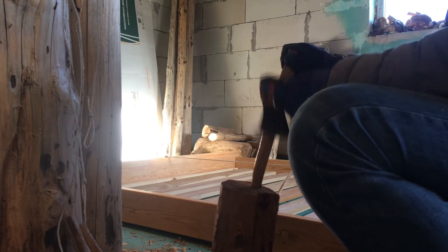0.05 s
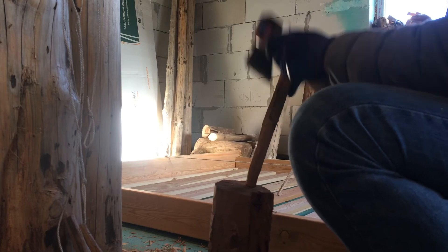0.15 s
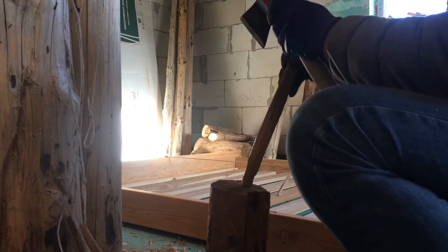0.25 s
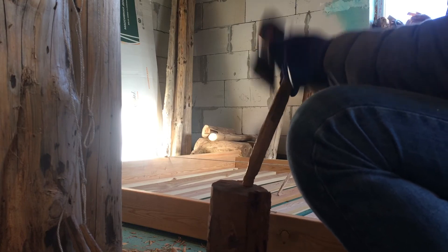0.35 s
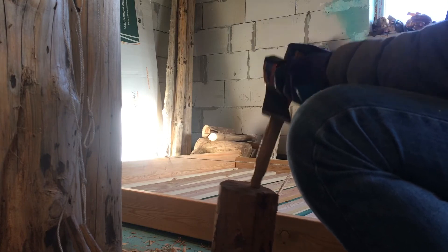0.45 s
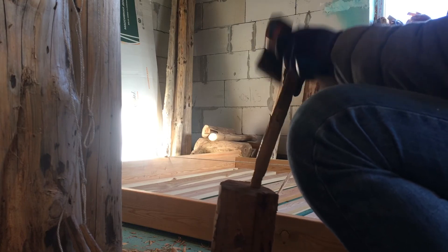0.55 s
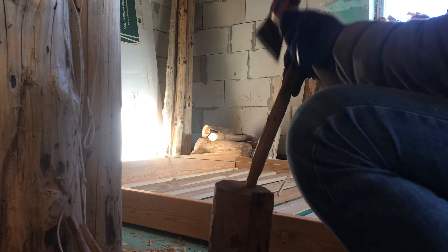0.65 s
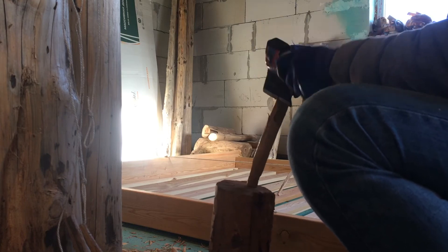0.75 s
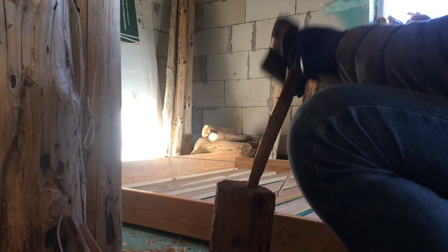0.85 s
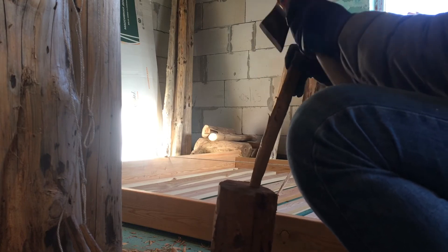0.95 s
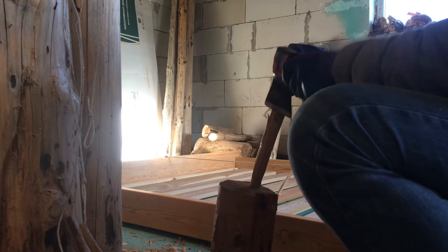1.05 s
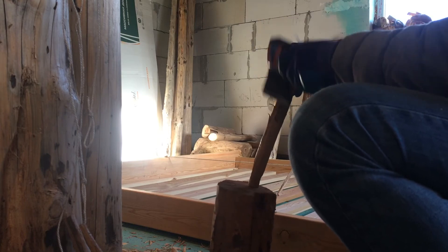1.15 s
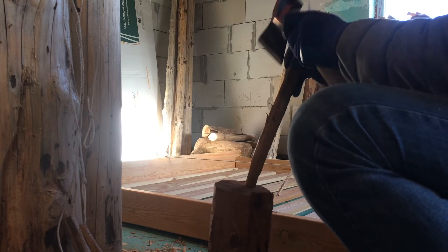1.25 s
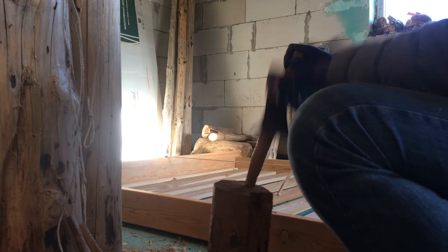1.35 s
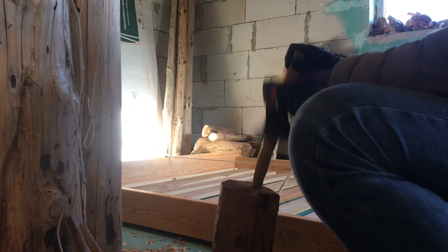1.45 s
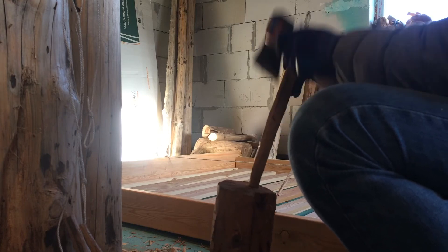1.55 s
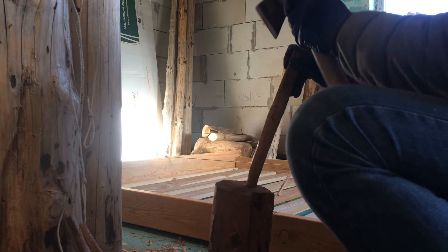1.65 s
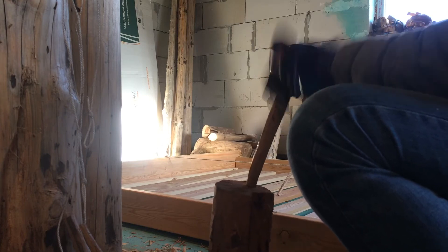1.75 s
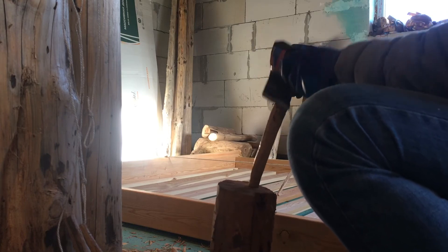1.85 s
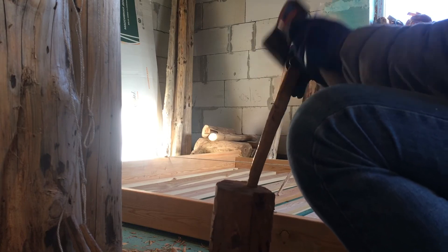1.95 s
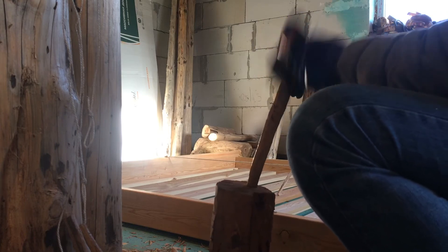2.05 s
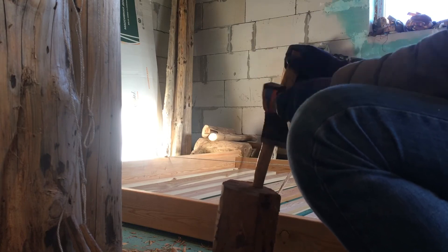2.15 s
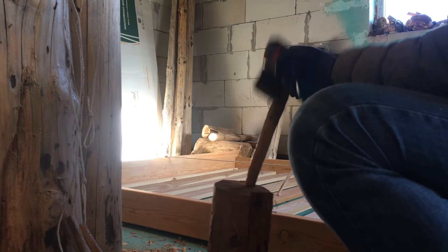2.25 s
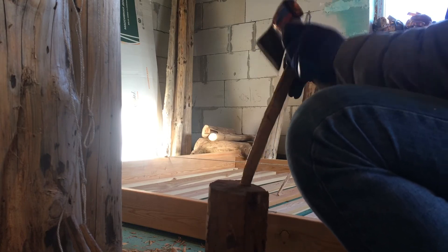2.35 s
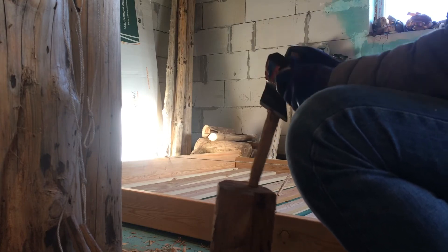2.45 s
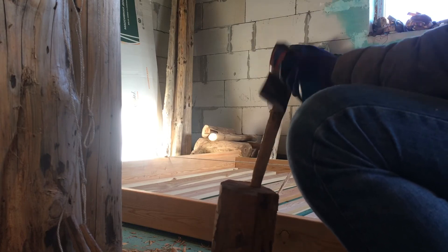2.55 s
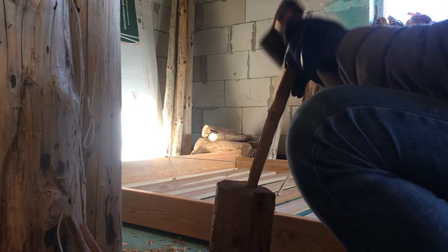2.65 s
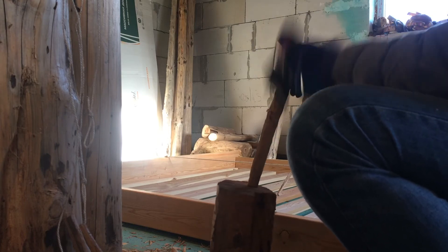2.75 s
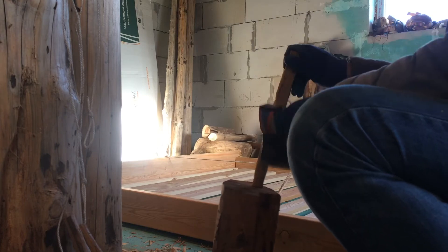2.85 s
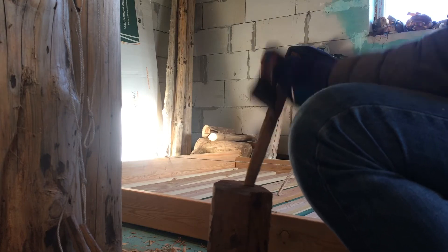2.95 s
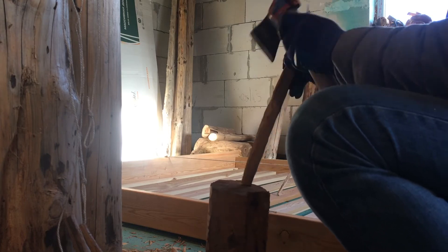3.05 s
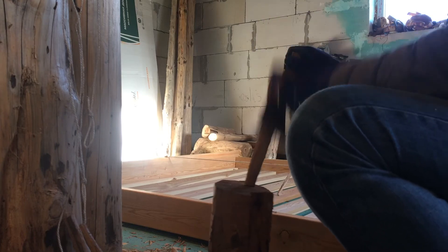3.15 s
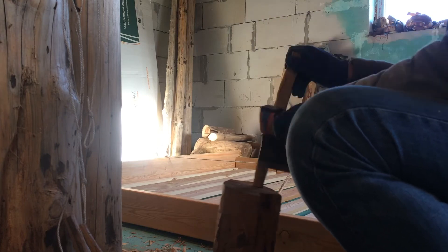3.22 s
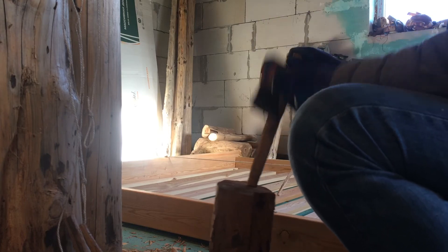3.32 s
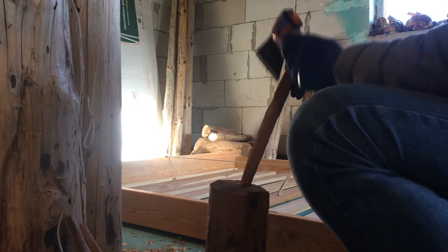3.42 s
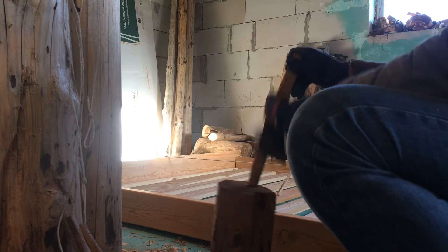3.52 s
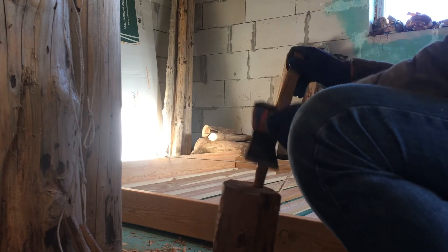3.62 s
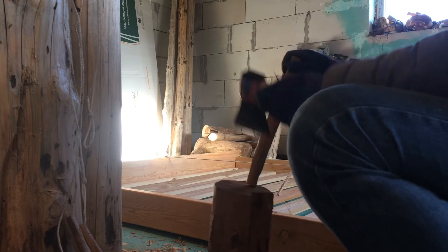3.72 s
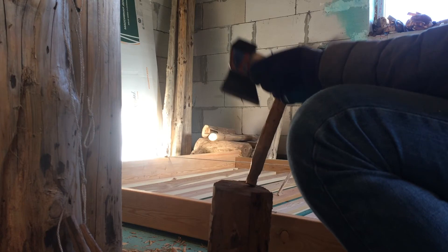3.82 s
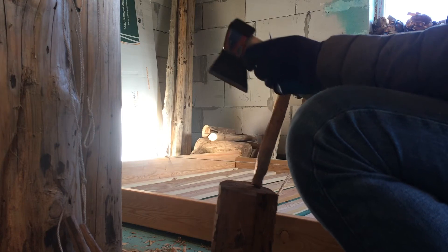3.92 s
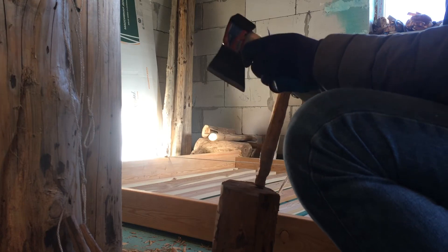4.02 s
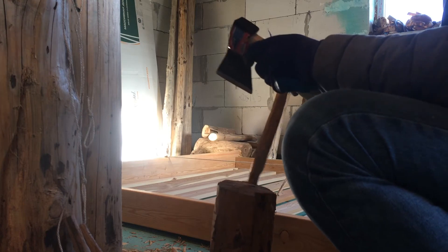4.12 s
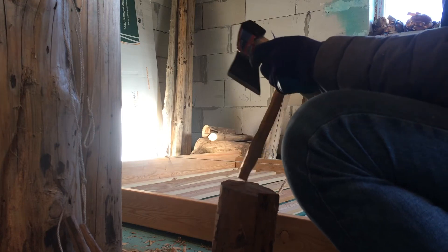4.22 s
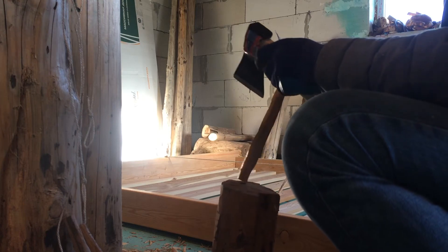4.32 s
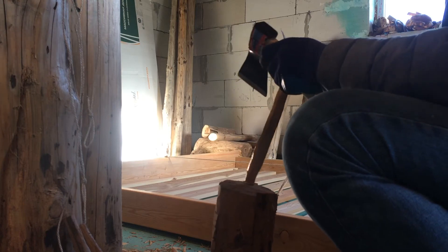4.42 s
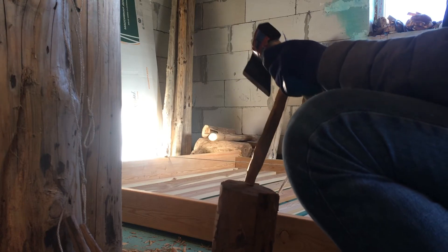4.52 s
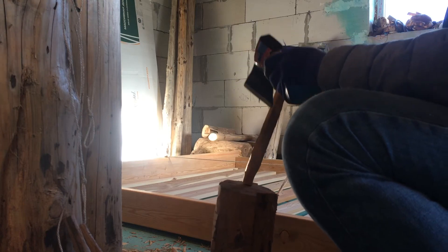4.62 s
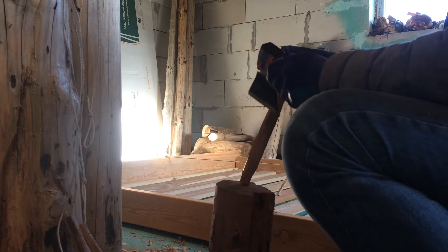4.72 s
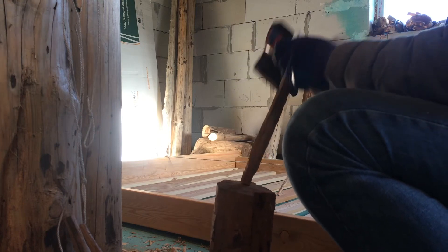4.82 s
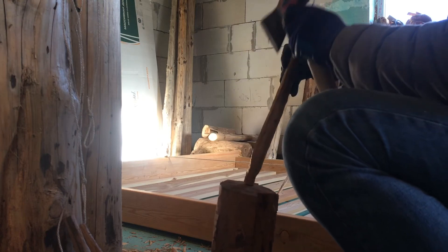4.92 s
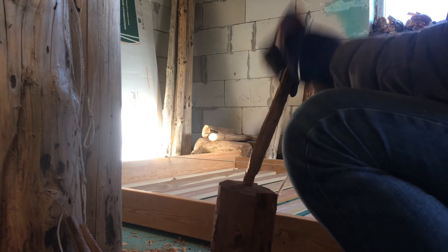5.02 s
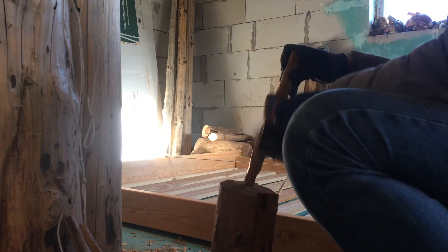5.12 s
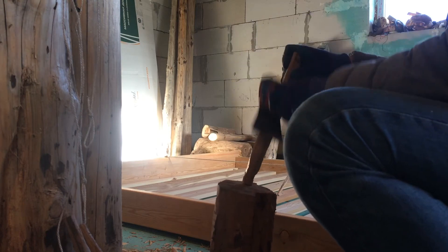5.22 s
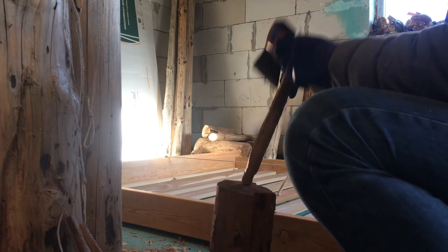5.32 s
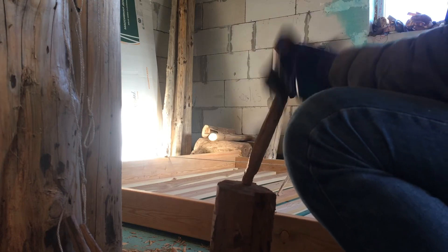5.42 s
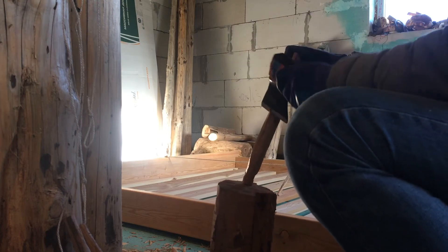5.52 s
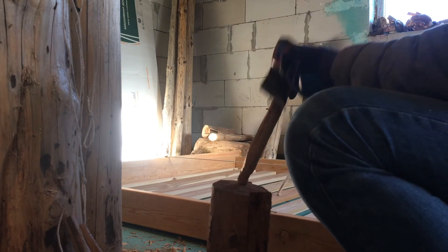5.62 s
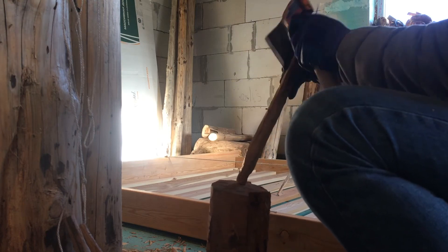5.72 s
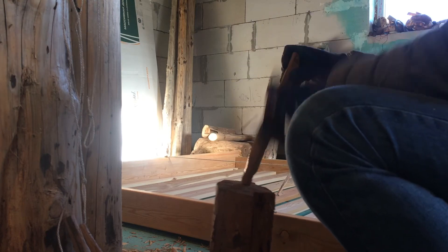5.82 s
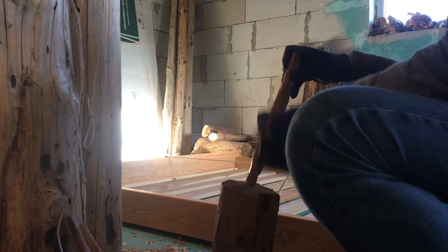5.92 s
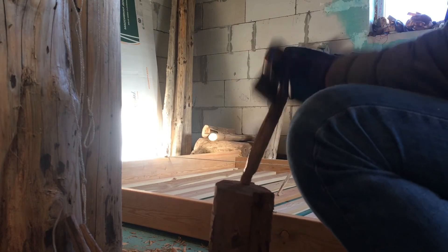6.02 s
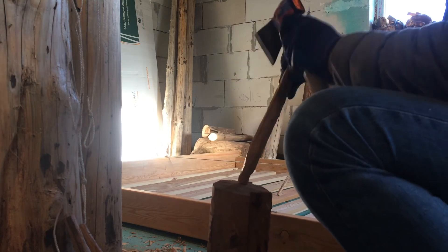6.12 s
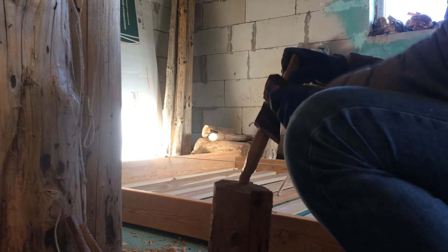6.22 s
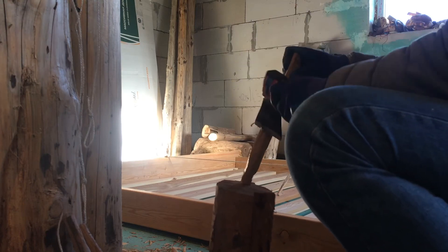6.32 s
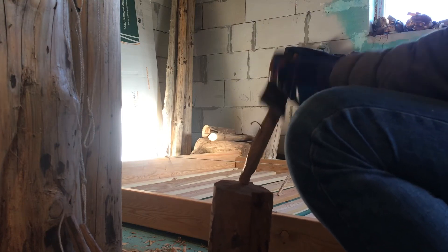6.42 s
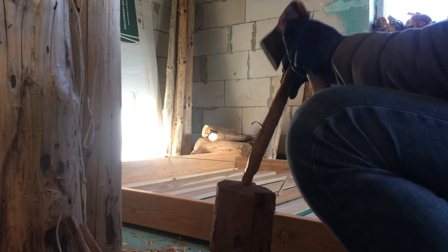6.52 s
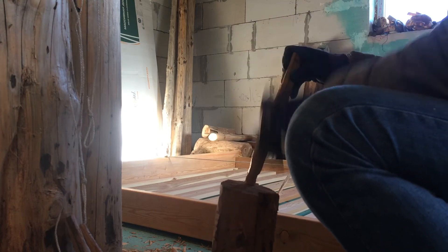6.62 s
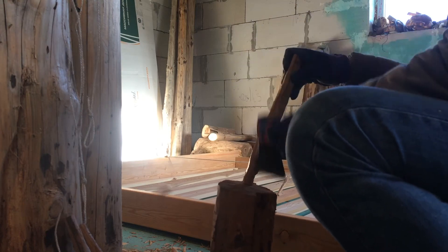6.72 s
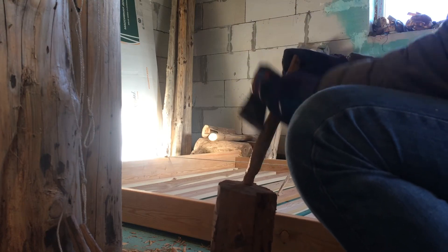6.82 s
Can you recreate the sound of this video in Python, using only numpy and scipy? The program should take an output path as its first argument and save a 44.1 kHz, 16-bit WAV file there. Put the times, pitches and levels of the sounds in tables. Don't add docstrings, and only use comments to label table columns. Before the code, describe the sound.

Sharp hatchet strokes knock and tear hardwood, the block thumping on floorboards, short bare-wall echoes over a low, distant outdoor rumble.

```python
import sys
import numpy as np
from scipy import signal
from scipy.fft import rfft, irfft
from scipy.io import wavfile
from scipy.ndimage import uniform_filter1d

SR = 44100
rng = np.random.default_rng(int(sys.argv[2]) if len(sys.argv) > 2 else 0)


def wav_out(sig):
    wavfile.write(sys.argv[1], SR, np.round(np.clip(np.atleast_2d(sig).T, -1, 1) * 32767).astype(np.int16))


def magnitude_from_level(level_db):
    exponent = np.asarray(level_db, float) / 20
    return 10 ** exponent


N = 302967

# time in seconds, peak level in dB, knock pitch in Hz,
# stick ring in dB, share sent to the room in dB.
BLOWS = [(0.021, -8.5, 1420, -5, -2.5), (0.4655, -25.5, 1040, -40, -2), (0.4679, -22, 670, -35, -13),
         (0.786, -17.5, 1060, -1, -11), (0.7889, -19, 1290, -23, -13), (1.1126, -16, 1020, 1, -4.5),
         (1.1183, -17.5, 800, -41, -10.5), (1.1188, -32, 850, -35, -26), (1.1211, -19, 730, -35, -30),
         (1.41, -10.5, 1380, -9, -4.5), (1.413, -13.5, 1360, -32, -20), (1.8398, -10, 1145, -22, -9),
         (1.842, -17.5, 900, -31, -34), (2.1462, -12.5, 1120, -2, -6), (2.148, -36, 980, -35, -15),
         (2.162, -30, 890, -25, -12), (2.168, -28, 900, -12, -6), (2.4922, -19.5, 940, -5, -5.5),
         (2.495, -22, 1280, -21, -22), (2.8506, -20.5, 980, -12, -3), (2.8521, -26, 780, -30, -15),
         (2.855, -15, 900, -36, -17), (2.861, -19, 1120, -5.5, -2.5), (2.8745, -34, 1300, -9, -15),
         (2.884, -26, 900, -15, -14), (2.8924, -21, 960, -12, -12), (2.926, -40, 1300, -8, -12),
         (3.228, -15, 1120, -2, -2), (3.229, -13, 1210, -37, -24), (3.232, -29, 1390, -12, -19),
         (3.265, -25, 1200, -7, -13), (3.557, -10.5, 1100, -7, -6), (5.1373, -27.5, 1560, 1.5, 0),
         (5.525, -13.5, 1084, -42, -10.5), (5.8895, -20, 1030, 1.5, 1), (5.896, -20, 1880, -38, -27),
         (5.9192, -22, 980, -7.5, -25), (6.2783, -8, 1320, -10.5, -6), (6.7001, -23, 1300, -37, -30),
         (6.7009, -30, 1300, -35, -26), (6.7019, -14, 1220, -7, -0.5), (6.7041, -24, 1340, -13, -20),
         (6.792, -34, 1300, 1, -15)]
# start in seconds, low, middle and top mode levels in dB,
# ring length as a factor.
STEEL = [(0.022, -56, -62, -75, 0.89), (0.468, -69, -71, -65, 0.37), (0.786, -72, -86, -85, 1.4),
         (1.1125, -52, -72, -68, 0.36), (1.409, -51, -60, -76, 1), (1.8392, -73, -43, -81, 0.15),
         (2.161, -50, -74, -74, 0.71), (2.4926, -71, -88, -85, 1.4), (2.861, -46.5, -49, -69, 0.64),
         (3.231, -46, -54, -71, 0.58), (3.559, -43.5, -67, -78, 0.79), (5.136, -51, -58, -72, 0.5),
         (5.199, -48.5, -62.5, -95, 0.57), (5.525, -76, -86, -75, 1.1), (5.675, -73, -77, -91, 0.7),
         (5.894, -53.5, -54, -77, 0.86), (6.285, -47.5, -76, -68, 0.35), (6.706, -34, -47.5, -64, 0.24),
         (6.829, -70, -61, -95, 0.28)]
# pitch in Hz, width in Hz, level in dB.
STICK = [(270, 260, -8.5), (549, 93, -7), (980, 186, -8.5), (1120, 940, -6), (1387, 62, -15.5),
         (1710, 140, -27), (2340, 340, -13), (3170, 1300, -12), (3890, 720, -53)]


def evened(x):
    return x / np.sqrt(np.mean(x ** 2) + 1e-20)


def read(points, hz):
    f, value = np.transpose(points)
    return np.interp(np.log(hz + 1), np.log(f + 1), value)


def add(mix, s, sound):
    part = mix[max(round(s * SR), 0):][:len(sound)]
    part += sound[:len(part)]


def latest(starts, lead):
    return np.maximum(np.searchsorted(np.array(starts) - lead, np.arange(N) / SR) - 1, 0)


def bandpass(order, edges_hz):
    return signal.butter(order, edges_hz, "band", fs=SR, output="sos")


def swell(t, db, rise, t60, bend):
    fall_db = 60 * np.maximum(t - rise, 0) / max(t60, .004)
    return magnitude_from_level(db - fall_db) * np.minimum(t / rise, 1) ** bend


def crackle(spread_db):
    unevenness = uniform_filter1d(rng.exponential(1, N), size=12)
    return evened(rng.standard_normal(N) * magnitude_from_level(spread_db * unevenness))


def coloured(x, points):
    log_gain = np.log(magnitude_from_level(read(points, np.fft.rfftfreq(8192, 1 / SR))))
    fold = np.r_[1, 2 * np.ones(4095), 1, np.zeros(4095)]
    response = irfft(np.exp(rfft(irfft(log_gain) * fold)))[:4096]
    return signal.oaconvolve(x, response)[:len(x)]


def ringing(x, modes):
    out = np.zeros(len(x))
    for k, (hz, width, db) in enumerate(modes):
        r, w = np.exp(-np.pi * abs(width) / SR), 2 * np.pi * hz / SR
        mode = signal.lfilter([0, np.sin(w)], [1, -2 * r * np.cos(w), r * r], x)
        out += (-1) ** k * magnitude_from_level(db) * mode
    return out


def resonate(x, hz, width):
    turn = np.exp(2j * np.pi * np.cumsum(hz) / SR)
    r = np.exp(-np.pi * width / SR)
    return 2 * (turn * signal.lfilter([1 - r], [1, -r], x / turn)).real


def air():
    # pitch in Hz, level in dB.
    air_colour = [(25, -39), (50, -1), (85, 0.5), (180, -7), (270, -15.5), (430, -10), (800, -12.5),
                  (1250, -13), (2000, -22.5), (4000, -27.5), (6500, -35.5), (10000, -45.5), (13000, -55),
                  (16000, -68)]
    # time in seconds, level in dB.
    air_level = [(0.0, -55), (0.31, -55.5), (1.01, -57), (2.5, -55), (4.06, -57), (4.4, -55.5), (5.51, -57),
                 (5.74, -55.5), (6.74, -55), (6.87, -51)]
    frames, hz = N // 512 + 5, np.fft.rfftfreq(2048, 1 / SR)
    a, b, patches = rng.standard_normal((frames, 1025, 3)).T
    patches = uniform_filter1d(patches, size=14, axis=0)
    patches = evened(uniform_filter1d(patches, size=8, axis=1))
    z = (a + 1j * b) * magnitude_from_level(read(air_colour, hz)[:, None] + 1.2 * patches)
    noise = evened(signal.istft(z, nperseg=2048, noverlap=1536)[1][:N])
    return noise * magnitude_from_level(np.interp(np.arange(N) / SR, *np.transpose(air_level)) + 5.5)


def room(x):
    # pitch in Hz, t60 in seconds.
    room_decay = [(100, 0.96), (500, 0.44), (1800, 0.56), (4800, 0.52), (8000, 0.43), (12000, 0.4),
                  (15500, 0.5)]
    taps = np.zeros((3, SR))
    at = np.arange(120, SR - 20, 20) + rng.integers(0, 20, (3, (SR - 121) // 20))
    np.put_along_axis(taps, at, rng.choice([-1., 1.], at.shape), 1)
    hz, t, z = signal.stft(taps, SR, nperseg=256)
    decay = magnitude_from_level(-60 * t / read(room_decay, hz)[:, None])
    filling_in = 1 - 0.05 * np.exp(-(t / 0.027) ** 2)
    tails = signal.istft(z * decay * filling_in, SR, nperseg=256)[1]
    tails = tails / np.linalg.norm(tails[0])
    turn = np.arange(N) / SR * 2.7 + np.arange(3)[:, None] * np.pi / 3
    return signal.fftconvolve(x * np.cos(turn), tails, axes=1)[:, :N].sum(0)


def thumps():
    # shove time in seconds, shove level in dB,
    # landing delay in seconds, landing level in dB, landing pitch in Hz.
    block_hops = [(0.026, -33, 0.079, -40, 147), (0.472, -34.5, 0.089, -39, 98),
                  (0.801, -35, 0.061, -31, 97), (1.123, -26, 0.067, -29, 110), (1.42, -39, 0.056, -37, 104),
                  (1.846, -29, 0.072, -30, 113), (2.166, -34, 0.068, -36, 95),
                  (2.502, -38.5, 0.067, -28.5, 92), (2.865, -37, 0.072, -35, 96),
                  (3.232, -37, 0.057, -38, 145), (3.562, -36.5, 0.078, -34.5, 102),
                  (5.145, -40, 0.066, -41.5, 138), (5.531, -37.5, 0.094, -34, 95),
                  (5.894, -39.5, 0.09, -40.5, 150), (6.287, -33, 0.076, -27.5, 118),
                  (6.704, -36.5, 0.064, -28.5, 104)]
    # delay in seconds, level in dB, pitch in Hz.
    rebounds = [
        (0.039, -16.5, 115),
        (0.083, -20, 110),
        (0.12, -19, 105),
    ]
    # time in seconds, level in dB, pitch in Hz.
    wobbles = [(0.212, -41, 111), (0.351, -42, 96), (0.6, -40, 119), (1.151, -35, 152), (1.215, -33, 111),
               (1.255, -37, 140), (1.505, -41, 99), (1.67, -46, 89), (1.875, -40, 155), (1.957, -35.5, 106),
               (1.98, -36.5, 141), (2.028, -40.5, 135), (2.15, -37, 130), (2.21, -33, 160),
               (2.525, -31, 110), (2.603, -36, 96), (2.647, -43, 95.4), (2.69, -41, 91), (3.04, -42.5, 90),
               (3.709, -41, 116), (3.797, -42, 94), (5.175, -43, 140), (5.58, -38, 150), (5.665, -38, 103),
               (6.075, -40.5, 110), (6.309, -30, 140), (6.41, -33, 145), (6.477, -38, 141),
               (6.499, -34.5, 89), (6.733, -33, 152)]
    # pitch in Hz, width in Hz, level in dB.
    boards = [(104, 19.3, -1.5), (152, 4.05, -9), (202, 6.2, -3)]
    shove_hz, rock_hz, cycles = 131, 145, 1.9
    out, hops = np.zeros(N), list(wobbles)
    for shove_s, shove_db, flight, land_db, land_hz in block_hops:
        land_s = shove_s + flight
        rock_s = shove_s + .43 * flight
        hops.append((shove_s, shove_db, shove_hz))
        hops.append((rock_s, (shove_db + land_db) / 2 - 2.5, rock_hz))
        hops.append((land_s, land_db, land_hz))
        hops += [(land_s + delay, land_db + db, hz) for delay, db, hz in rebounds]
    for s, db, hz in hops:
        u = np.arange(int(cycles / hz * SR)) / SR * hz
        wave = -np.sin(2 * np.pi * u) - 0.27 * np.sin(4 * np.pi * u)
        bump = np.sin(np.pi * (u / cycles) ** 0.59) ** 2
        add(out, s - 0.438 * cycles / hz, magnitude_from_level(db) * wave * bump)
    return out + magnitude_from_level(-51.5) * ringing(out, boards)


def ticks():
    # time in seconds, click level in dB, woody level in dB, fizz level in dB.
    small_ticks = [(0.292, -47, -47, -84), (1.6107, -56, -59, -57), (1.691, -58, -55, -50),
                   (2.0905, -43.5, -40, -69), (2.6874, -42, -51, -73), (3.1123, -48, -41, -101),
                   (3.466, -51, -44, -90), (3.8854, -48, -78, -90), (3.9894, -38, -34.5, -83),
                   (4.2574, -59, -55, -89), (4.3412, -45, -43, -87), (4.873, -41.5, -41.5, -88),
                   (5.415, -59, -43, -86), (5.5947, -48, -52, -58), (5.6035, -55, -46, -75),
                   (5.842, -42, -36, -75), (6.1554, -43.5, -40.5, -75), (6.185, -47, -65, -92)]
    out, t = np.zeros(N), np.arange(900) / SR
    bands = [bandpass(2, edges_hz) for edges_hz in ([2800, 6800], [900, 2370], [7500, 13000])]
    for (s, *levels_db), noise in zip(small_ticks, rng.standard_normal((len(small_ticks), 900))):
        for db, band, t60 in zip(levels_db, bands, (.008, .03, .02)):
            crack = signal.sosfilt(band, (noise + 5 * (t == 0)) * magnitude_from_level(-60 * t / t60))
            add(out, s, magnitude_from_level(db) * crack / abs(crack).max())
    return out


def next_blow(s):
    return min([row[0] for row in STEEL if row[0] > s] + [N / SR])


def steel():
    # pitch in Hz, t60 in seconds.
    head_free = [(5772, .72), (11134, .44), (15300, .3)]
    # pitch in Hz, level in dB.
    thin_modes = [(12850, -22), (13650, -16), (9400, -3)]
    # time in seconds, low mode change in dB, upper modes change in dB.
    swings = [
        (1.66, -6, -4),
        (2.9, -6, 3),
        (3.02, -16, -6),
        (3.3, 0, -11),
        (5.33, 1, -6),
        (6.775, -24, -8),
    ]
    settle_s, song_rise_s, swing_s = 0.022, 0.0065, 0.0081
    out, t = np.zeros((2, N)), np.arange(SR // 2) / SR
    slide = t + 0.0047 * settle_s * (1 - np.exp(-t / settle_s))
    fade_in = np.minimum(t / song_rise_s, 1)
    for (s, *levels_db, length), draw in zip(STEEL, rng.random((len(STEEL), 6))):
        modes = [(db, hz, t60) for db, (hz, t60) in zip(levels_db, head_free)]
        modes += [(levels_db[-1] + db, hz, head_free[-1][1]) for hz, db in thin_modes]
        for k, (db, hz, t60) in enumerate(modes):
            twin = np.sin(2 * np.pi * (hz * (1 + .004 * draw[k]) * t + draw[k - 3]))
            pair = np.sin(2 * np.pi * hz * slide) + .3 * twin
            fall = magnitude_from_level(db + 3.5 - 60 * t / (t60 * max(length, .1)))
            add(out[min(k, 1)], s, fall * pair * fade_in)
    now = np.arange(N) / SR
    waver = uniform_filter1d(uniform_filter1d(rng.standard_normal((2, N)), size=700), size=500)
    level_db = 1.2 * evened(waver)
    for s, low_db, upper_db in swings:
        swung = np.clip((now - s) / swing_s, 0, 1) * (now < next_blow(s))
        level_db = level_db + np.outer([low_db, upper_db], swung)
    return (out * magnitude_from_level(level_db)).sum(0)


def rings():
    # time in seconds, tock level in dB, upper tone level in dB,
    # upper tone pitch in Hz, third tone level in dB.
    stick_rings = [(0.0207, -39, -51, 2790, -65), (0.4668, -73, -63, 2800, -72),
                   (0.788, -40.5, -82, 3070, -76), (1.113, -60, -47.5, 3017, -69),
                   (1.411, -32.5, -55, 2840, -54), (1.841, -38.5, -73, 2770, -73),
                   (2.143, -38, -52, 2940, -62), (2.493, -48, -64, 2945, -72), (2.849, -46, -56, 2940, -66),
                   (3.228, -41.5, -53.5, 2910, -59), (3.557, -73, -68, 3060, -65),
                   (5.136, -49, -57, 2820, -70), (5.526, -41.5, -70, 2800, -74),
                   (5.8903, -49, -47, 2904, -48), (6.2792, -46, -66, 2950, -64),
                   (6.703, -39, -44, 2875, -66)]
    # pitch in Hz, t60 in seconds.
    fixed_tones = [(1333, 0.32), (3375, 0.09), (7990, 1)]
    out, t = np.zeros(N), np.arange(SR // 3) / SR
    tock, third, side = fixed_tones
    for s, tock_db, upper_db, upper_hz, third_db in stick_rings:
        tones = [(tock_db - 0.5, *tock), (upper_db + 2.5, upper_hz, .26),
                 (third_db + 11.0, *third), (-79, *side)]
        for db, hz, t60 in tones:
            pair = np.sin(2 * np.pi * hz * t) + .45 * np.sin(2 * np.pi * hz * 1.014 * t)
            add(out, s, magnitude_from_level(db - 60 * t / t60) * pair)
    return out


def splinters():
    # peak time in seconds, level in dB, swell in seconds, t60 in seconds.
    spits = [(0.028, -56, .006, .05), (0.038, -60, .004, .02), (0.472, -46, .003, 0.027),
             (0.79, -61, .003, .03), (1.121, -44, .003, 0.027), (1.42, -58, .008, .06),
             (1.431, -56, .003, .07), (1.843, -55, .003, .03), (2.169, -50, .01, 0.054),
             (2.498, -60, .004, .03), (2.86, -41, .004, .04), (2.875, -60, .004, .08),
             (3.245, -60, .01, .03), (3.565, -52, .004, 0.075), (3.576, -65, 0.0033, 0.054),
             (5.145, -61, .006, .05), (5.537, -57, .006, 0.028), (5.596, -64, .001, .01),
             (5.604, -68, .001, .01), (5.897, -60, .004, .04), (5.918, -68, .002, .02),
             (5.93, -60, 0.0033, .04), (6.291, -48, .008, 0.043), (6.703, -42, .003, 0.029),
             (6.715, -60, .004, 0.16)]
    # pitch in Hz, level in dB.
    spit_colour = [(5000, -20), (8000, -1), (11000, 7), (13000, -14), (15500, 1)]
    level, t = np.zeros(N), np.arange(SR // 6) / SR
    for s, db, swell_s, t60 in spits:
        rise = max(swell_s, .0005)
        add(level, s - rise, swell(t, db, rise, t60, 1.8))
    return magnitude_from_level(3) * coloured(level * crackle(6.0), spit_colour)


def tinted(x):
    # time in seconds, middle band change in dB, upper band change in dB.
    blow_tint = [(0.02, -5, 0), (0.465, -4, -2), (0.785, -0.5, -1), (1.112, 0, -3.5), (1.409, -3.5, -1.5),
                 (1.839, -2.5, -6.5), (2.143, 1, -6.5), (2.492, 0.5, -0.5), (2.849, 3.5, -1),
                 (3.227, 2.5, -5.5), (3.556, 4, -1), (5.136, -4.5, -6), (5.524, 2, -12), (5.889, 4, 0),
                 (6.277, -4.5, -5), (6.7, -7, 3.5)]
    # lower edge in Hz, upper edge in Hz.
    tint_bands = [(450, 950), (1700, 2600), (3000, 4600)]
    s, middle_db, upper_db = np.transpose(blow_tint)
    blow = latest(s, .02)
    out = x
    for db, edges_hz in zip((0.9, middle_db[blow], upper_db[blow]), tint_bands):
        out = out + (magnitude_from_level(db) - 1) * signal.sosfiltfilt(bandpass(2, edges_hz), x)
    return out


def blade(chatter):
    # time in seconds, low mode in Hz,
    # middle mode in Hz, clang level in dB.
    grip = [(0.0213, 5920, 11180, -24.5), (0.4663, 5870, 11350, -36), (0.786, 6115, 11300, -36),
            (1.111, 5950, 11440, -42), (1.4098, 5870, 11050, -28), (1.8414, 6020, 11000, -50),
            (2.146, 5870, 11200, -38), (2.4924, 5910, 10900, -37.5), (2.85, 5840, 11300, -40),
            (3.2273, 5855, 11000, -37), (3.5566, 5920, 11100, -31), (5.136, 5920, 11200, -59),
            (5.526, 5914, 11100, -37), (5.8883, 5830, 10800, -47), (6.278, 5920, 11600, -36),
            (6.7, 5816, 11500, -29)]
    # pitch in Hz, width in Hz, level in dB.
    head_gripped = [(8050, 550, -9.5), (16600, 650, -72)]
    blow = latest([row[0] for row in grip], .03)
    low_hz, middle_hz = np.array(grip)[blow, 1:3].T
    gripped = resonate(chatter, low_hz, 93) + magnitude_from_level(-23.5) * resonate(chatter, middle_hz, 82)
    clang, t = np.zeros(N), np.arange(SR // 8) / SR
    for s, low, middle, db in grip:
        tone = np.sin(2 * np.pi * low * t) + magnitude_from_level(-12) * np.sin(2 * np.pi * middle * t)
        add(clang, s, magnitude_from_level(db - 60 * t / 0.022) * tone)
    return magnitude_from_level(4.5) * gripped + clang + magnitude_from_level(-35.5) * ringing(chatter, head_gripped)


def cuts():
    # time in seconds, level in dB, t60 in seconds,
    # brightness in dB, steel chatter in dB.
    fibre_cuts = [(0.02, -12, 0.039, -39, 4), (0.4654, -24, 0.04, -4, 10), (0.785, -19, 0.03, -18, 1.5),
                  (1.1131, -16, 0.041, -30, 3), (1.118, -35, 0.013, 5.5, -1),
                  (1.4088, -6, 0.019, -45, -2.5), (1.428, -28, 0.055, -5.5, 3),
                  (1.8378, -12, 0.034, -24.5, -6.5), (2.1435, -11.5, 0.043, -26, -12),
                  (2.16, -27, 0.14, -8, 4.5), (2.4922, -16.5, 0.022, -12.5, -4),
                  (2.849, -23, 0.053, -31, 6.5), (2.855, -28, 0.13, -8, 6), (2.877, -29, 0.046, -31, -25),
                  (3.2269, -22.5, 0.11, -45, 5.5), (3.262, -37, 0.058, -25, -10),
                  (3.5554, -12.5, 0.027, -42, -0.5), (3.567, -20.5, 0.052, -10, -1),
                  (5.1357, -19.5, 0.05, -38, -4), (5.191, -34, 0.049, -40, -4),
                  (5.5231, -15.5, 0.034, -32, -5.5), (5.888, -20.5, 0.043, -28, 7.5),
                  (5.914, -26, 0.09, -21, 4), (6.033, -36.5, 0.03, -35, -5), (6.277, -12.5, 0.069, -33, -3),
                  (6.284, -21.5, 0.041, -12, 5.5), (6.6982, -17, 0.069, -11, 1),
                  (6.737, -33, 0.029, -23, -10)]
    # pitch in Hz, level in dB.
    fibre_colour = [(200, -57), (600, -14), (1400, -12), (2400, -6), (3300, 2.5), (4400, -9.5), (5200, -26),
                    (6500, -9.5), (9000, -70), (16000, -61)]
    clean_rise_s, torn_rise_s, bite_s = 0.0011, 0.0041, .0009
    snaps = crackle(5.0)
    wood, fizz, chatter, burst = np.zeros((4, N))
    t = np.arange(SR // 8) / SR
    for s, db, t60, bright_db, steel_db in fibre_cuts:
        raggedness = np.clip((bright_db + 34) / 19, 0, 1)
        rise = clean_rise_s + (torn_rise_s - clean_rise_s) * raggedness
        level = swell(t, db, rise, t60, .6)
        add(wood, s + bite_s, level)
        add(fizz, s + bite_s, level * magnitude_from_level(bright_db))
        add(chatter, s + bite_s, level * magnitude_from_level(steel_db))
        energy = np.sqrt(max(t60, .004) * SR / np.log(1e6))
        add(burst, s + .004, magnitude_from_level(db) * energy * np.ones(1))
    tear = wood * snaps
    knock_hz = np.array(BLOWS)[latest([row[0] for row in BLOWS], .01), 2]
    span = sum(resonate(tear, k * 0.808 * knock_hz, 120) for k in range(2, 8))
    body = magnitude_from_level(-1.0) * coloured(tear + magnitude_from_level(-7.5) * span, fibre_colour)
    body = body + magnitude_from_level(-30.0) * ringing(tear, STICK)
    metal = blade(chatter * snaps)
    hiss = magnitude_from_level(-11.5) * signal.sosfilt(bandpass(1, [6800, 11500]), fizz * snaps)
    sent = magnitude_from_level(-13.5) * body + magnitude_from_level(-10.5) * coloured(burst, fibre_colour)
    sent = sent + magnitude_from_level(-13.0) * metal + magnitude_from_level(-9) * hiss
    return body + metal + hiss, sent


def knocks():
    pulse, push, sent = np.zeros((3, N))
    for s, db, hz, ring_db, room_db in BLOWS:
        u = (np.arange(200) - 100) / SR * hz
        shape = magnitude_from_level(db) * np.cos(2 * np.pi * 1.14 * u - .95) * np.exp(-(u / .5) ** 2)
        add(pulse, s - 100 / SR, shape)
        add(sent, s - 100 / SR, magnitude_from_level(room_db) * shape)
        add(push, s, magnitude_from_level(db + ring_db) * np.ones(1))
    stick = ringing(push, STICK)
    thin = signal.butter(2, 390, "high", fs=SR, output="sos")
    return signal.sosfilt(thin, pulse + stick), sent + magnitude_from_level(-6.5) * stick


def scene():
    # time in seconds, level in dB.
    thrown = [(0.02, 0.5), (0.465, -2.5), (0.785, -3), (1.112, -2), (1.409, 0), (1.839, -3.5),
              (2.143, -1.5), (2.492, -1.5), (2.849, 0), (3.227, 2), (3.556, -2), (5.136, 4), (5.524, 1),
              (5.889, 0), (6.277, -0.5), (6.7, -2)]
    knock, sent = knocks()
    tear, torn = cuts()
    tone, song, tick, hop, spit = rings(), steel(), ticks(), thumps(), splinters()
    s, thrown_db = np.transpose(thrown)
    to_walls = tinted(sent + torn * magnitude_from_level(thrown_db[latest(s, .02)]))
    to_walls = to_walls + magnitude_from_level(-5) * tone + magnitude_from_level(-13) * song + magnitude_from_level(-12) * tick
    to_walls = to_walls + magnitude_from_level(-34) * spit + magnitude_from_level(-10) * hop
    direct = knock + tinted(tear) + tone + song + tick + spit + hop
    return (direct + room(to_walls) + air())[None]


def band_limit(x):
    return signal.sosfilt(signal.butter(12, 15650, fs=SR, output="sos"), x)


def record(dry):
    low_cut = signal.butter(2, 45, "high", fs=SR, output="sos")
    top_cut = signal.butter(8, 15800, fs=SR, output="sos")
    return band_limit(signal.sosfilt(top_cut, signal.sosfilt(low_cut, dry)))


dry = scene()
out = record(dry)
wav_out(out)
```